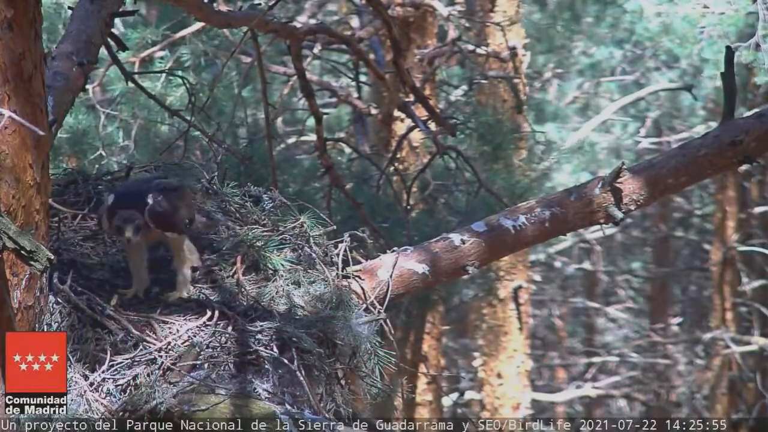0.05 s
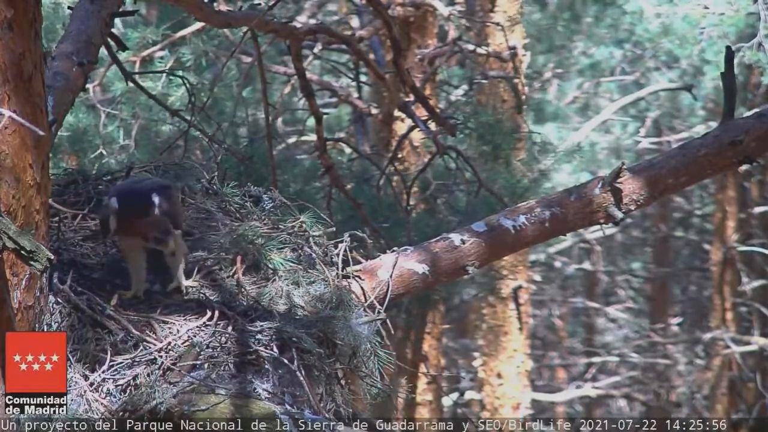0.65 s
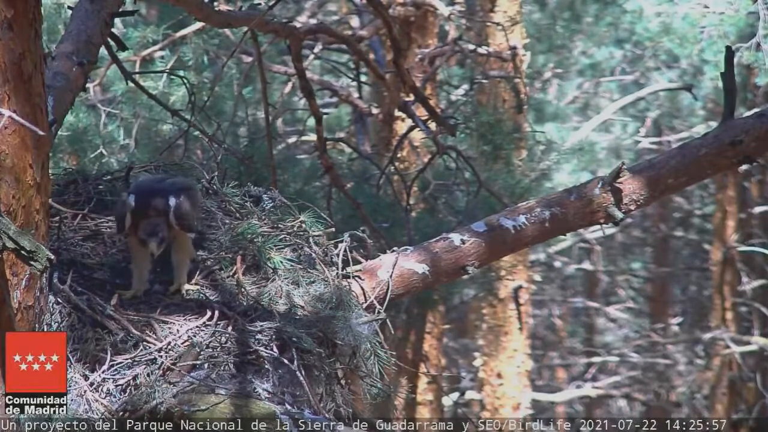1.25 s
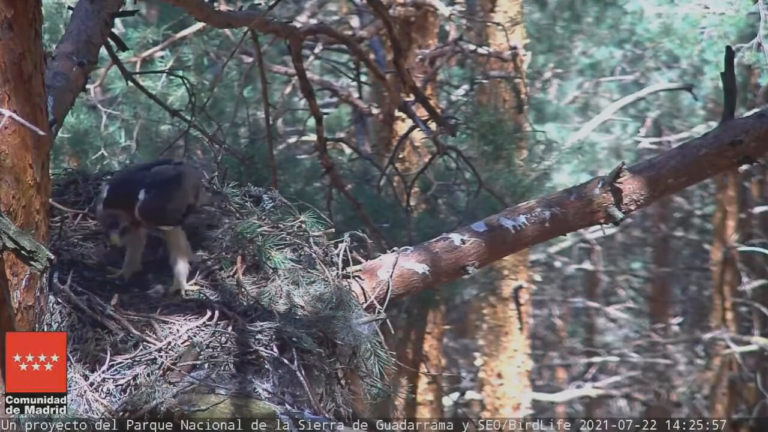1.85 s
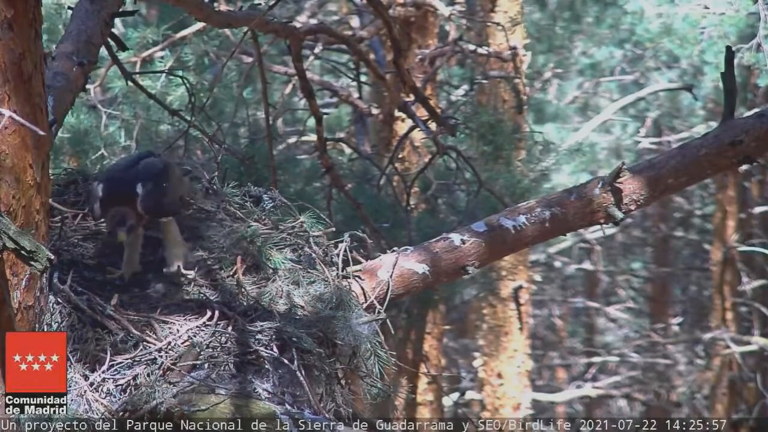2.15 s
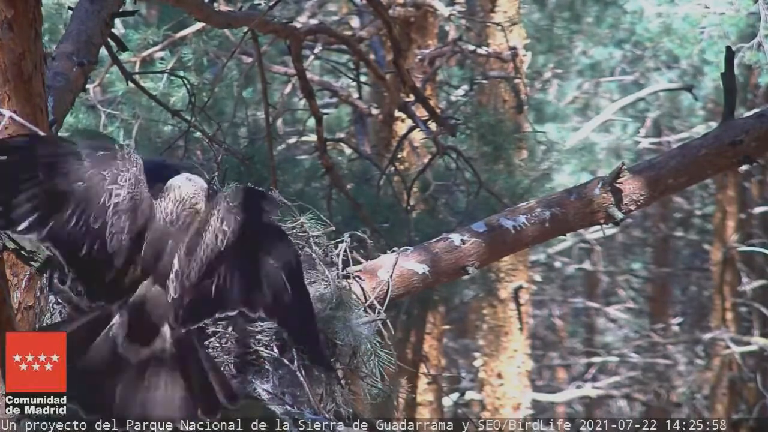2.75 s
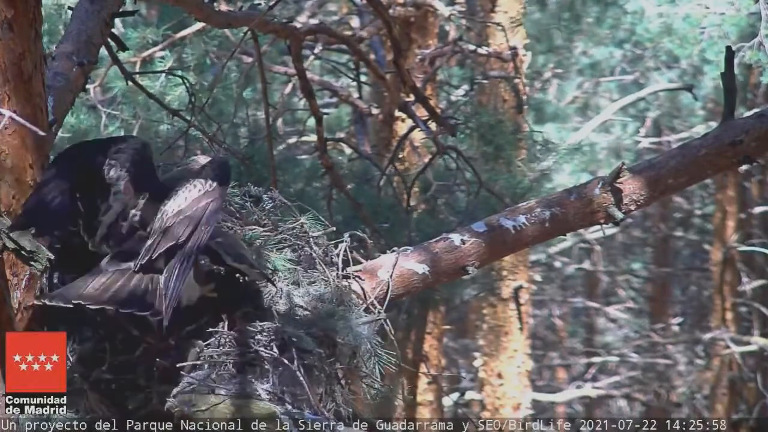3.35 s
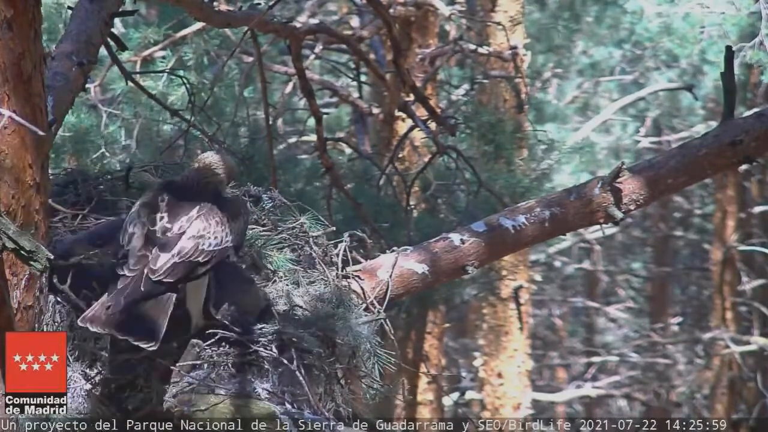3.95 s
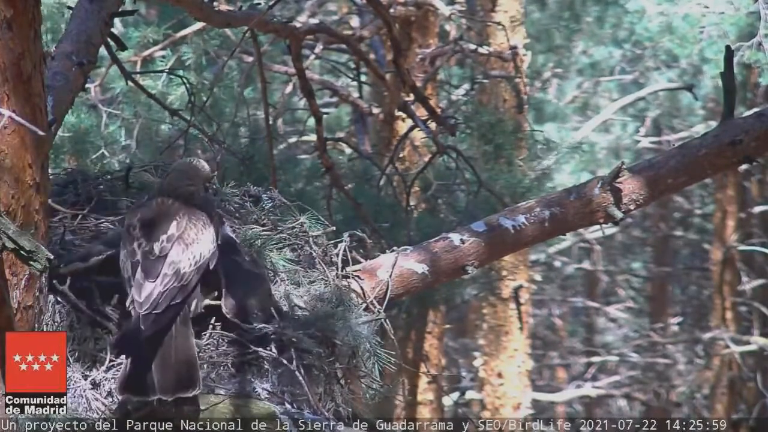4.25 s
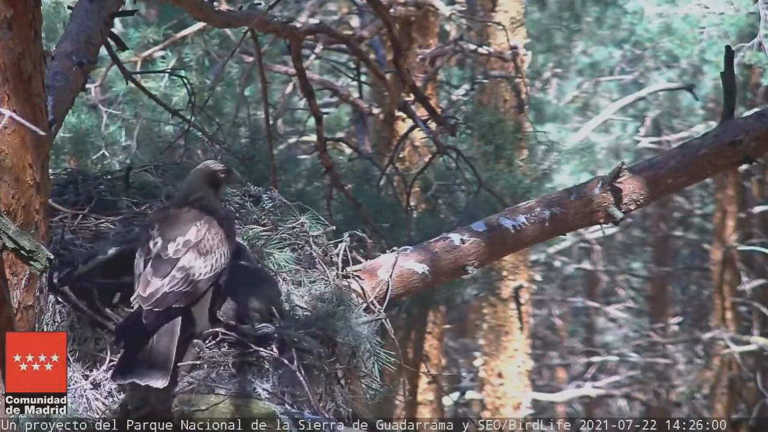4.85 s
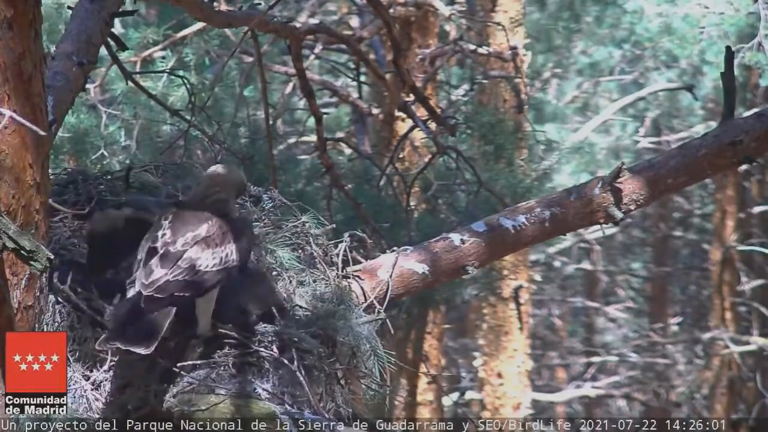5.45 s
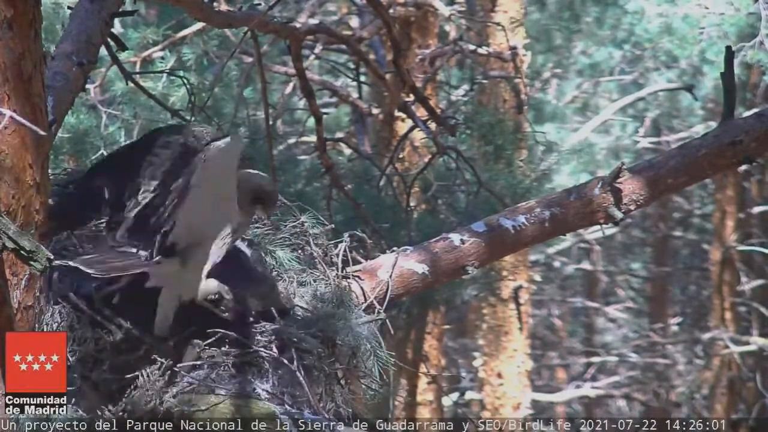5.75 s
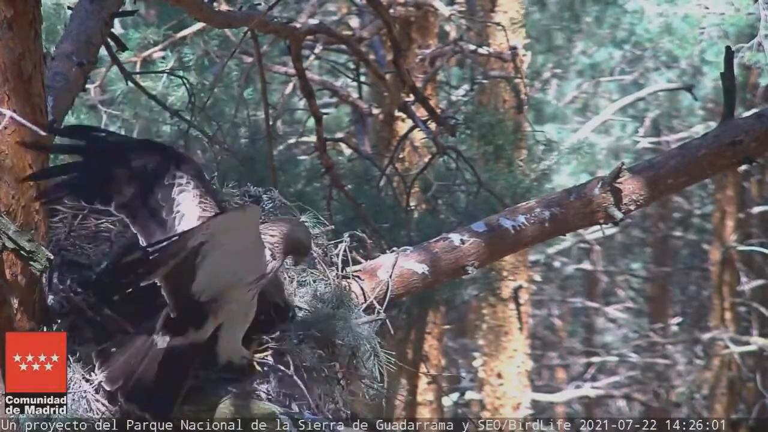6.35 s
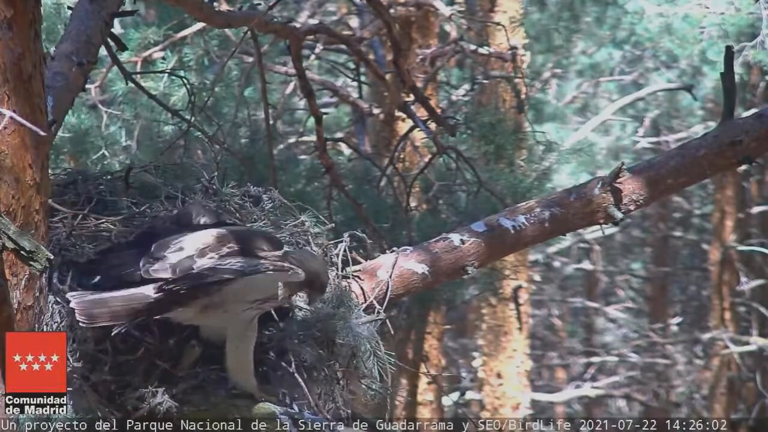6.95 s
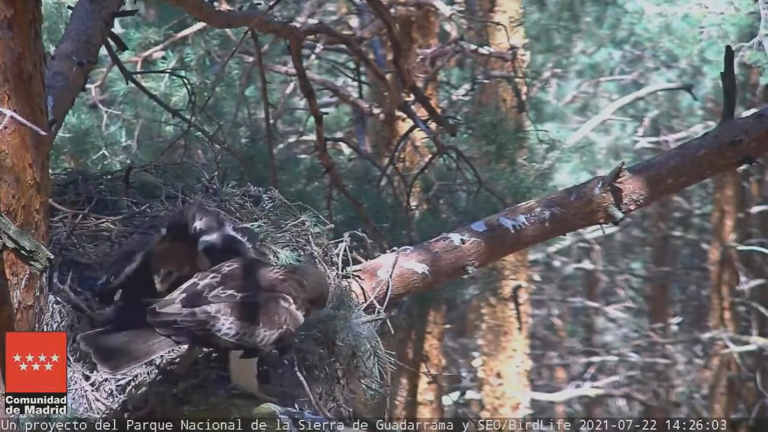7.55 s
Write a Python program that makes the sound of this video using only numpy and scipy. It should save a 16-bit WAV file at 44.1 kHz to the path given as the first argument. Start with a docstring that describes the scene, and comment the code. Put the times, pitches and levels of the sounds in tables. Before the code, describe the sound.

A large bird of prey gives a fast run of high, piping chirps among trees, every whistle sliding up and then dropping to a brief yelp. A dull thump and low gusts hit the microphone near the start, followed by weaker bumps. The calls carry on to the end, quieter and more uneven in the second half, while faint hiss, ticks and short regular gaps give a slightly glitchy texture.

```python
"""Wind rumbles on a microphone at an eagle's nest in a hissing pine wood. From the start the bird calls
again and again: its vibrating syrinx gives a rising whistle that breaks into a short yelp, and the trees
scatter both. The sound link, whose clock wobbles and slips, stalls in the first call, cuts back in with
a thump, then drops out about four times a second. Near 3.4 s it stalls again; faint tones ring near
3.6 s, a scrap of call echo where the link jumps. From about 4 s on the calls are mostly softer."""
import sys
import numpy as np
from scipy import signal
from scipy.fft import rfft, irfft
from scipy.io import wavfile
from scipy.ndimage import uniform_filter1d, minimum_filter1d

SR = 44100
rng = np.random.default_rng(int(sys.argv[2]) if len(sys.argv) > 2 else 0)


def transcribe(signal):
    """Save signal, clipped to [-1, 1], as a 16-bit WAV file at the path in sys.argv[1]."""
    frames = np.atleast_2d(signal).T
    limited = np.clip(frames, -1, 1)
    pcm = np.round(limited * 32767).astype(np.int16)
    wavfile.write(sys.argv[1], SR, pcm)


N = 335601
TIME = np.arange(N) / SR
LINK_TOP_HZ = 9650

# steady hiss of the wood and the microphone: (frequency [Hz], relative spectral density [dB])
HISS_SPECTRUM = [(40, 10.5), (150, 6.5), (300, 2.5), (600, -1), (1200, -6), (2500, -9.5), (5000, -8),
                 (7200, -11.5), (8200, -59.5), (9500, -19), (11000, -26)]
# wind rumble: (frequency [Hz], relative spectral density [dB])
WIND_SPECTRUM = [(10, -7.5), (20, -0.5), (30, 2.5), (45, -11), (70, -14.5), (110, -22.5), (200, -34.5),
                 (400, -45), (1000, -54), (3000, -101.5)]
# gusts on the microphone: (peak time [s], level [dB], half-width [s])
WIND_GUSTS = [(0.017, -28, 0.034), (0.23, -31.5, 0.1), (0.518, -34, 0.051), (0.81, -45.5, 0.13),
              (1.625, -47, .15), (1.847, -39.5, 0.072), (2.325, -48, 0.4), (2.87, -49, 0.05),
              (3.233, -44.5, 0.18), (3.62, -39, 0.17), (4.064, -39, 0.07), (4.552, -42, 0.051),
              (4.7, -40.5, 0.085), (4.99, -37.5, 0.015), (5.6, -51.5, 0.16), (7.586, -47, 0.14)]
# whistles: (start [s], length [s], scoop time [s], push delay [s], push length [s], held pitch [Hz],
# top pitch [Hz], relative held level [dB], relative top level [dB], hoarseness [share of pitch])
WHISTLE_NOTES = [(0.005, 0.14, 0.0098, 0.042, 0.034, 4580.0, 5510.0, -34, -39.5, 0.0061),
                 (0.332, 0.13, 0.028, 0.11, 0.023, 4767, 5590, -38, -33, 0.0034),
                 (0.595, 0.15, 0.022, 0.11, 0.06, 4910, 5834, -44, -32.5, 0.004),
                 (0.815, 0.077, 0.019, 0.056, 0.0044, 4830.0, 5660, -40.5, -27.5, 0.013),
                 (1.045, 0.14, 0.024, 0.091, 0.073, 4533, 5496, -44, -30, 0.0018),
                 (1.384, 0.17, 0.026, 0.11, 0.107, 4494, 5528, -43, -28.3, 0.0017),
                 (1.765, 0.15, 0.024, 0.12, 0.035, 5020, 5580, -42, -28.5, 0.0033),
                 (2.127, 0.21, 0.044, 0.16, 0.058, 4900, 5663, -36.5, -31, 0.0043),
                 (2.538, 0.18, 0.043, 0.14, 0.031, 5472, 5600.0, -33.5, -32, 0.0039),
                 (2.916, 0.149, 0.027, 0.135, 0.03, 5444, 5740, -35, -35.5, 0.0044),
                 (3.21, 0.042, 0.0043, 0.018, 0.026, 4500.0, 5400.0, -44, -44.5, 0.0049),
                 (3.374, 0.17, 0.041, 0.14, 0.014, 6100.0, 5700, -39, -42, 0.019),
                 (3.777, 0.12, 0.006, 0.09, 0.063, 4740.0, 5540, -49, -28.5, 0.0062),
                 (4.087, 0.14, 0.018, 0.054, 0.04, 6080, 5963, -44.5, -49.5, 0.0088),
                 (4.349, 0.17, 0.009, 0.098, 0.011, 5450, 5810, -55, -61.5, 0.013),
                 (4.666, 0.18, 0.013, 0.11, 0.053, 5316, 5930, -53, -59.5, 0.02),
                 (5.002, 0.083, 0.007, 0.048, 0.012, 5250, 5480, -45.5, -46.9, 0.006),
                 (5.261, 0.15, 0.018, 0.077, 0.012, 5285, 5444, -34.5, -37.5, 0.0068),
                 (5.571, 0.15, 0.0075, 0.094, 0.08, 4684, 5540.0, -48, -40, 0.011),
                 (5.924, 0.12, 0.012, 0.044, 0.015, 4846, 5355, -40, -47.5, 0.018),
                 (6.231, 0.14, 0.047, 0.12, 0.008, 4893, 4800, -44, -58, 0.0026),
                 (6.578, 0.15, 0.042, 0.071, 0.01, 5066, 5180, -44, -39.5, 0.006),
                 (6.969, 0.094, 0.006, 0.051, 0.044, 4730.0, 5700, -67, -57, 0.0084),
                 (7.279, 0.14, 0.023, 0.07, 0.029, 4980.0, 5560, -51.5, -43, 0.017)]
# periodic timing error: (multiple of the wobble rate [1], depth [dB re one sample])
WOBBLE_HARMONICS = [(1, -9), (2, -13.5), (3, -17), (4, -30.5)]
# clock slips at set moments: (time [s])
SLIP_TIMES = [.256, .341, .424, .725, .744, 1.173, 1.236, 1.6, 1.876, 1.897, 2.281, 2.325, 2.345, 2.638,
              2.645, 2.709, 2.964, 3.006, 3.839, 3.881, 3.925, 5.333, 5.376, 5.696, 6.336]
# long dropouts: (start [s], end [s])
LINK_STALLS = [(.069, .18), (3.325, 3.468)]
# yelps: (start [s], length [s], pitch [Hz], sagged pitch [Hz], relative level [dB],
# last note length [s], last note level [dB])
YELP_NOTES = [(0.132, .048, 3510, 2956, -41.5, 0.0049, -35), (0.466, .039, 3463, 2960, -42, 0.012, -44),
              (0.746, 0.0076, 3524, 3480, -43.5, 0.0098, -56),
              (0.898, 0.054, 3658, 3196, -42, 0.016, -40.5), (1.187, 0.048, 3632, 3235, -42, 0.01, -38.5),
              (1.555, 0.039, 3510, 3130, -43, 0.011, -40), (1.914, 0.044, 3590, 3170, -45, 0.024, -45.5),
              (2.337, 0.035, 3490, 3130, -42.5, 0.015, -47.5),
              (2.732, 0.051, 3475, 3147, -45.5, .012, -48.5),
              (3.065, 0.029, 3610, 3414, -45.5, 0.0046, -41.5),
              (3.264, 0.014, 3590, 3550, -47.5, 0.0027, -47), (3.537, .018, 4280, 3600, -55, .005, -51),
              (3.901, 0.041, 3870, 3430, -41, 0.0077, -46), (4.223, 0.037, 3930, 3070, -56, 0.0089, -44.5),
              (4.488, 0.046, 4200, 3040, -57, .011, -50), (4.826, 0.058, 4160, 3150, -53.5, 0.017, -43.5),
              (5.083, .057, 4004, 3865, -48, 0.0215, -45.5), (5.4, 0.039, 3577, 3280, -46.5, .013, -44),
              (5.711, 0.032, 3900, 3820, -44, 0.018, -40.5), (6.033, 0.041, 3830, 3680, -51, 0.017, -42),
              (6.363, .038, 3870, 3150, -56, .014, -45.5), (6.731, 0.029, 4140, 4050, -54.5, 0.022, -47.5),
              (7.071, 0.04, 3857, 3760, -49, .018, -47.5), (7.409, 0.048, 3950, 3730, -51.5, 0.029, -45.5)]
# the higher the yelp, the weaker its octave: (pitch [Hz], octave level [dB re the fundamental])
OCTAVE_BY_PITCH = [(3480, 2), (3640, -0.5), (3850, -18)]
# low thumps, the first as the link cuts back in: (time [s], peak level [dB])
LOW_THUMPS = [(0.182, -13), (.55, -24.5), (1.861, -26.5), (3.234, -29.5)]
# dull pops where the link slips during the rumble: (time [s], peak level [dB])
SLIP_POPS = [(0.211, -32.5), (0.256, -37), (0.34, -30), (0.359, -38), (0.557, -36.5), (1.857, -34.5),
             (3.199, -38.5), (3.241, -32), (3.729, -38.5), (4.07, -40)]
# faint ringing tones, a scrap of call echo where the link jumps: (start [s], pitch [Hz], level [dB])
RING_TONES = [(3.555, 6020, -48.5), (3.667, 5750, -50.5), (3.667, 3650, -58.5), (3.667, 6980, -61)]


def from_db(db):
    """Amplitude grows tenfold for every 20 dB."""
    return 10 ** (np.asarray(db) / 20)


def rms_one(x):
    """Normalisation to unit rms."""
    return x / np.sqrt(np.mean(x ** 2) + 1e-20)


def drift(rate_hz, size, settle=4000):
    """Two-pole smoothing turns white noise into a slow wander of unit rms."""
    pole = np.exp(-2 * np.pi * rate_hz / SR)
    wander = signal.lfilter([1], [1, -2 * pole, pole * pole], rng.standard_normal(size + settle))
    return rms_one(wander[settle:])


def coloured_noise(spectrum):
    """Spectral shaping of white noise, at unit rms."""
    hz, db = np.transpose(spectrum)
    bins = np.maximum(np.fft.rfftfreq(N, 1 / SR), 1)
    gain = from_db(np.interp(np.log(bins), np.log(hz), db))
    return rms_one(irfft(rfft(rng.standard_normal(N)) * gain, N))


def low_pass(x, hz):
    """Band limiting by a steep elliptic filter."""
    return signal.sosfilt(signal.ellip(10, rp=.2, rs=80, Wn=hz, fs=SR, output="sos"), x)


def add(out, start, sound):
    """Superposition: a sound joins the mix at its start time."""
    i = max(int(start * SR), 0)
    out[i:i + len(sound)] += sound[:N - i]


def note_time(start, end, fade_s):
    """Time axis of a note and its trapezoidal envelope."""
    t = start + np.arange(max(int((end - start) * SR), 64)) / SR
    return t, np.clip(np.minimum(t - t[0], t[-1] - t) / fade_s, 0, 1)


def hiss(level_db=-62):
    """Stationary broadband noise of the wood and the microphone."""
    return from_db(level_db) * coloured_noise(HISS_SPECTRUM)


def wind_strength(breeze_db=-54.5):
    """Incoherent addition: bell-shaped gusts and a light breeze sum in power to give an rms amplitude."""
    gust_power = sum(from_db(db) ** 2 * np.exp(-((TIME - at) / half_s) ** 2)
                     for at, db, half_s in WIND_GUSTS)
    return np.sqrt(from_db(breeze_db) ** 2 + gust_power)


def wind():
    """Pressure fluctuations on the microphone make a rumble whose amplitude follows the gusts."""
    rumble = coloured_noise(WIND_SPECTRUM)
    local_rms = np.sqrt(uniform_filter1d(rumble ** 2, size=6000))
    return wind_strength() * rumble / local_rms


def ticks(per_s=16, spread_db=4, over_wind_db=1, median_cap_db=-42, top_hz=7000):
    """A Poisson process of faint dry ticks that grow with the gusts."""
    onsets = rng.random(N) < per_s / SR
    level = np.minimum(wind_strength() * from_db(over_wind_db), from_db(median_cap_db))
    clicks = onsets * level * from_db(spread_db * np.minimum(rng.standard_normal(N), 2))
    return signal.lfilter(*signal.butter(1, top_hz, fs=SR), clicks + 1e-18)


def syrinx_phase(hz, jitter):
    """Phase is the integral of frequency, here that of a membrane whose pitch trembles."""
    return 2 * np.pi * np.cumsum(hz * (1 + jitter * drift(310, len(hz)))) / SR


def whistles(scoop_from_hz=4000, scoop_db=23.5, swell_lag_s=0.0088, break_s=0.0059, break_fall=0.23,
             break_db=-4, flutter_db=2.0, waver_db=1.83, rasp_db=-22, attack_s=0.0012, trim_db=1.45):
    """Frequency and amplitude modulation: a near-pure tone scoops up, holds, is pushed, then breaks."""
    out = np.zeros(N)
    for note in WHISTLE_NOTES:
        start, length, scoop_s, push_after, push_s, held_hz, top_hz, held_db, top_db, hoarse = note
        t, envelope = note_time(0, length, fade_s=0.0008)
        push = .5 + .5 * np.tanh(2 * (t - push_after) / push_s)
        collapse = np.clip(1 - (length - t) / break_s, 0, 1) ** 2
        pitch = held_hz + (top_hz - held_hz) * push - (held_hz - scoop_from_hz) * np.exp(-t / scoop_s)
        phase = syrinx_phase(pitch * (1 - break_fall * collapse), hoarse)
        swell_db = -scoop_db * np.exp(-t / (scoop_s + swell_lag_s))  # the level lags the pitch
        db = held_db + (top_db - held_db) * push + swell_db + break_db * collapse
        level = from_db(db + trim_db + flutter_db * drift(190, len(t)) + waver_db * drift(40, len(t)))
        rasp = 1 + from_db(rasp_db) * drift(600, len(t))
        attack = 1 - np.exp(-t / attack_s)
        add(out, start, np.sqrt(2) * envelope * attack * level * rasp * np.sin(phase))
    return out


def wood_echo(x, near_db=-22, near_t60=0.15, far_db=-11.5, far_t60=0.33, build_s=0.0075,
              turn_span_s=(1.8, 4.4), turn_db=1):
    """Reverberation: quick scattering from nest and branches, then a tail building among the trunks."""
    t = np.arange(SR) / SR
    near = rng.standard_normal(SR) * from_db(-60 * t / near_t60) * (t > .002)
    far = rng.standard_normal(SR) * from_db(-60 * t / far_t60) * (1 - np.exp(-t / build_s))
    response = from_db(near_db) * near / np.linalg.norm(near)
    response += from_db(far_db) * far / np.linalg.norm(far)
    # the bird turns away, so more of its voice goes into the trees
    into_trees = x * from_db(np.interp(TIME, turn_span_s, [0, turn_db]))
    return x + signal.fftconvolve(into_trees, response)[:N]


def limiter(x, ceiling_db=-22.0):
    """Peak limiting: the gain ducks for a few milliseconds wherever peaks pass the ceiling."""
    gain = np.minimum(1, from_db(ceiling_db) / (np.abs(x) + 1e-9))
    return x * uniform_filter1d(minimum_filter1d(gain, size=200), size=200)


def clock_wobble(x, rate_hz=3890, random_db=-31):
    """Phase modulation: periodic timing error gives each tone sidebands; random error adds hiss."""
    periodic = sum(from_db(db) * np.sin(2 * np.pi * k * rate_hz * TIME) for k, db in WOBBLE_HARMONICS)
    error = periodic + from_db(random_db) * rng.standard_normal(N)
    return x + np.gradient(x) * error


def crackle(x, per_s=140, size_db=-15, spread_db=6, fizz_db=-44):
    """Timing error scales with slope: stray samples and slight jitter put grit and fizz on loud calls."""
    mistimed = rng.random(N) < per_s / SR
    grit = mistimed * from_db(size_db + spread_db * np.minimum(rng.standard_normal(N), 2))
    fizz = from_db(fizz_db) * rng.standard_normal(N)
    return x + np.gradient(x) * (grit + fizz)


def clock_slips(x, per_s=20, skip_s=0.0028, treble_db=-7):
    """Discontinuity: each jump of the read position is a dullish tick as strong as the sound it cuts."""
    jumps = rng.random(N) < per_s / SR
    jumps[(np.array(SLIP_TIMES) * SR).astype(int)] = True
    offsets = (rng.uniform(-1, 1, N) * skip_s * SR).astype(int)
    read_at = np.clip(np.arange(N) + offsets[np.cumsum(jumps)], 0, N - 1)
    slipped = x[read_at]
    treble = signal.sosfiltfilt(signal.butter(8, LINK_TOP_HZ, "high", fs=SR, output="sos"), slipped)
    return slipped - (1 - from_db(treble_db)) * treble


def dropouts(x, first_s=.383, frame_s=1024 / 48000, every_frames=12.304, lead_frames=.24,
             mute_s=.0175, sink_s=0.053):
    """Gating: each lost frame leaves a hard-edged gap; in a stall the held value decays exponentially."""
    out = x.copy()
    lost_frames = np.floor(np.arange(lead_frames, N / SR / frame_s, every_frames))
    for start in first_s + frame_s * lost_frames:
        out[int(start * SR):int((start + mute_s) * SR)] = 0
    for start, end in LINK_STALLS:
        i, j = int(start * SR), int(end * SR)
        out[i:j] = x[i] * np.exp(-TIME[:j - i] / sink_s)
    return out


def yelps(jitter=0.018, sag_power=2.81, flutter_db=1.5, trim_db=-.5,
          last_glide_hz=(2550, 2118), last_octave_db=-19):
    """Register break: a lower, rougher tone with its octave holds, sags, then drops to a last note."""
    out = np.zeros(N)
    for start, length, hz, sag_hz, db, last_s, last_db in YELP_NOTES:
        t, envelope = note_time(0, length + 0.0024, fade_s=0.0018)
        sag = np.linspace(0, 1, len(t)) ** sag_power
        phase = syrinx_phase(hz + (sag_hz - hz) * sag, jitter)
        octave_db = np.interp(hz, *np.transpose(OCTAVE_BY_PITCH))
        tone = np.sin(phase) + from_db(octave_db) * np.sin(2 * phase)
        add(out, start, envelope * tone * from_db(db + trim_db + flutter_db * drift(220, len(t))))
        # the brief last note overlaps the end of the sag
        t, envelope = note_time(length - .001, length + last_s + .002, fade_s=.004)
        phase = syrinx_phase(np.linspace(*last_glide_hz, len(t)), jitter)
        tone = np.sin(phase) + from_db(last_octave_db) * np.sin(2 * phase)
        add(out, start + t[0], envelope * tone * from_db(last_db + flutter_db * drift(190, len(t))))
    return np.sqrt(2) * out


def thumps(width_s=0.0046):
    """A broad, smooth pulse holds only low frequencies: thumps, the first as the link cuts back in."""
    out = np.zeros(N)
    for at, peak_db in LOW_THUMPS:
        u = (TIME - at) / width_s
        out += from_db(peak_db) * (1 - u ** 2 / 2) * np.exp(-u ** 2 / 2)
    return out


def slip_pops(relax_s=0.0041):
    """Exponential relaxation: steps where the link slips during the rumble die away as dull pops."""
    impulses = np.zeros(N)
    for at, peak_db in SLIP_POPS:
        impulses[int(at * SR)] = from_db(peak_db) * rng.choice([-1, 1])
    return signal.lfilter([1], [1, -np.exp(-1 / (relax_s * SR))], impulses + 1e-18)


def rings(t60=0.38, blur=0.0314):
    """Exponential decay: faint blurred tones fade as a scrap of call echo where the link jumps."""
    out = np.zeros(N)
    t = np.arange(SR // 2) / SR
    for start, hz, db in RING_TONES:
        phase = syrinx_phase(np.full(len(t), hz), blur)
        add(out, start, np.sqrt(2) * from_db(db - 60 * t / t60) * np.sin(phase))
    return out


def scene():
    """Superposition: the eagle among the trees, ringing tones, wind, thumps, pops, ticks and hiss."""
    eagle = wood_echo(whistles() + yelps())
    return (eagle + rings() + wind() + thumps() + slip_pops() + ticks() + hiss())[None]


def record(dry, line_noise_db=-91, cutoff_hz=16100):
    """Transmission: a limiter, then a band-limited link with an unsteady clock, gaps and faint noise."""
    sent = low_pass(clock_wobble(limiter(dry[0])), LINK_TOP_HZ)
    received = dropouts(crackle(clock_slips(sent)))
    line_noise = from_db(line_noise_db) * rng.standard_normal(N)
    return low_pass(received + line_noise, cutoff_hz)[None]


dry = scene()
out = record(dry)
transcribe(out)
```